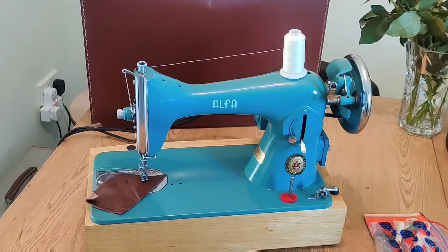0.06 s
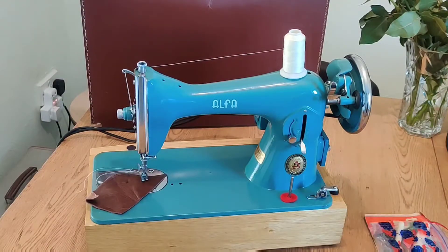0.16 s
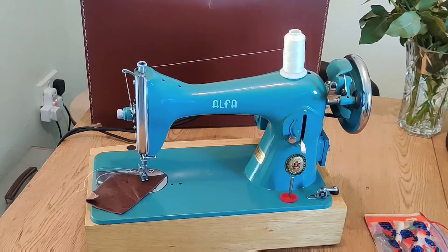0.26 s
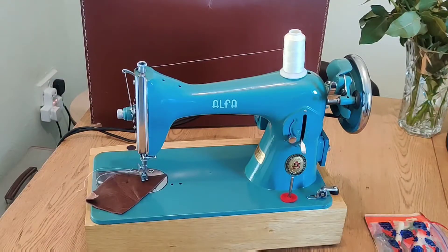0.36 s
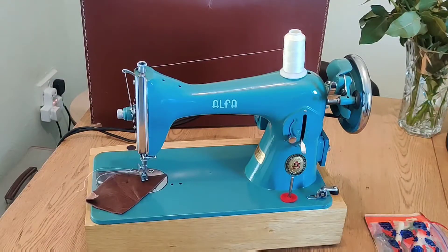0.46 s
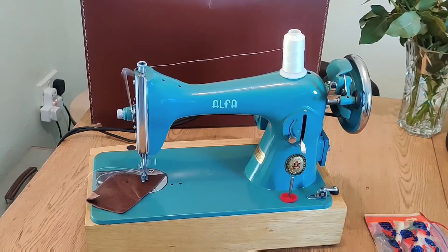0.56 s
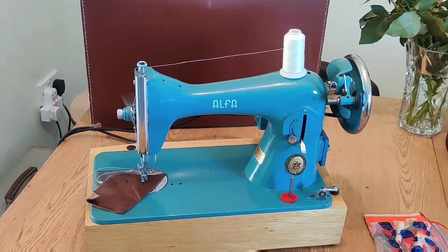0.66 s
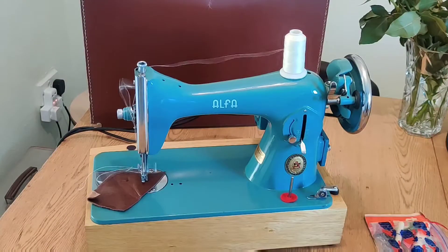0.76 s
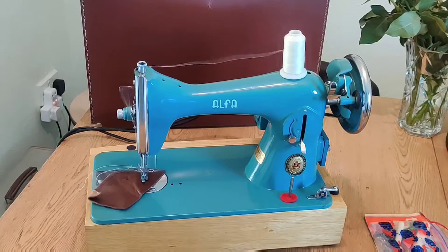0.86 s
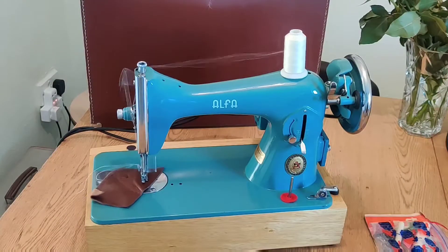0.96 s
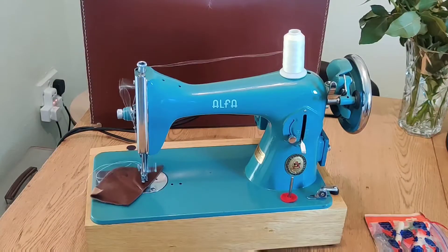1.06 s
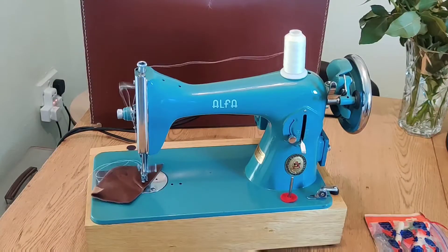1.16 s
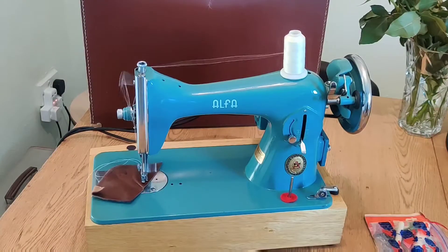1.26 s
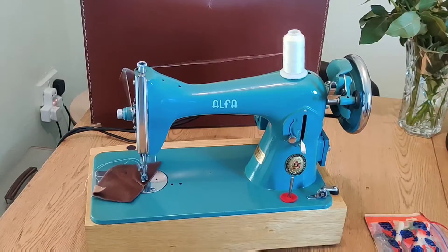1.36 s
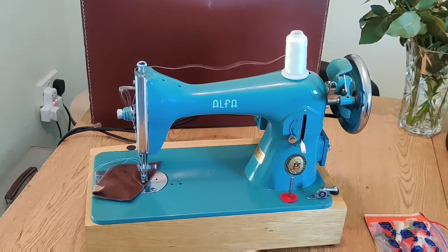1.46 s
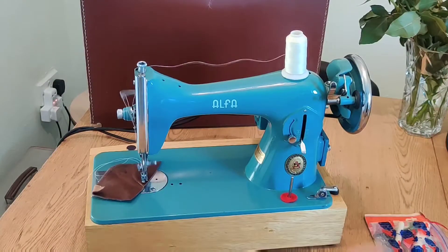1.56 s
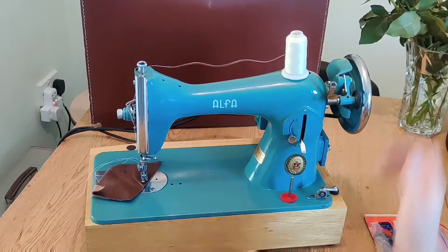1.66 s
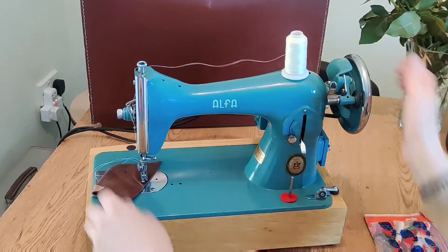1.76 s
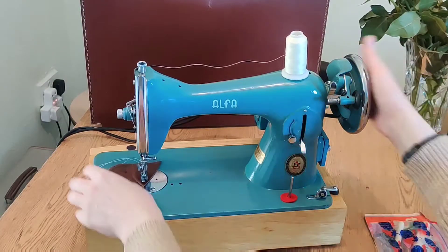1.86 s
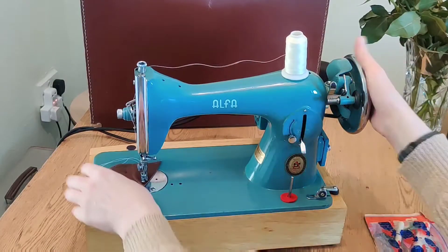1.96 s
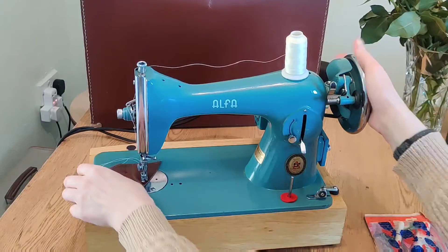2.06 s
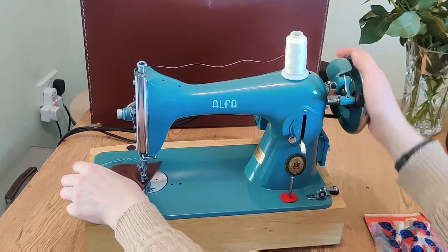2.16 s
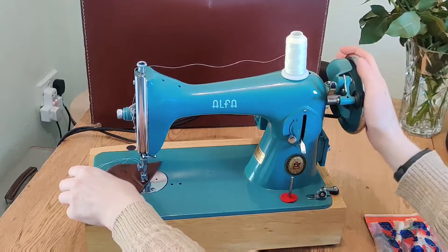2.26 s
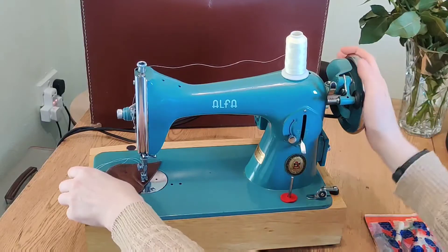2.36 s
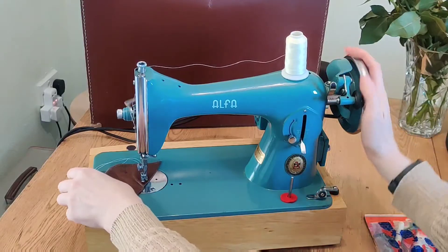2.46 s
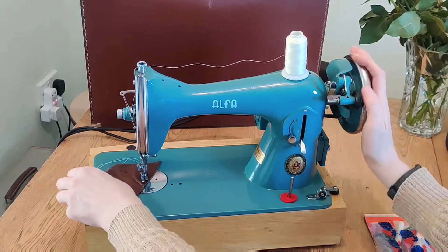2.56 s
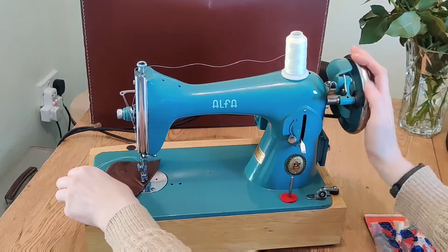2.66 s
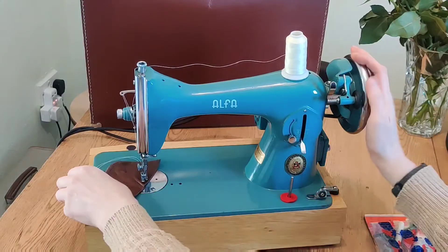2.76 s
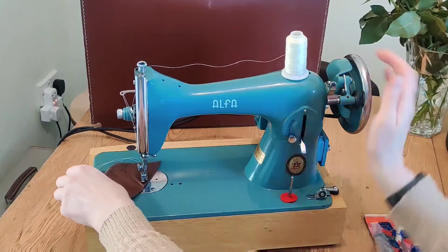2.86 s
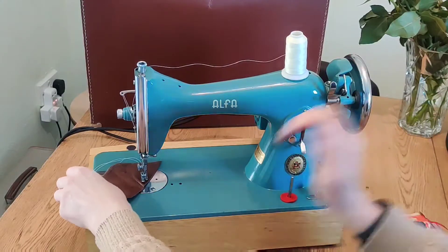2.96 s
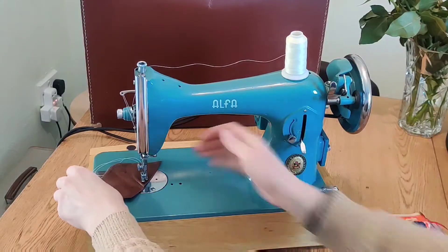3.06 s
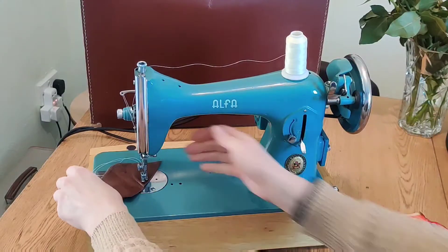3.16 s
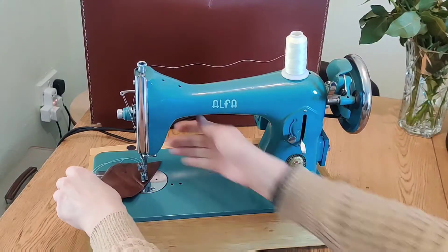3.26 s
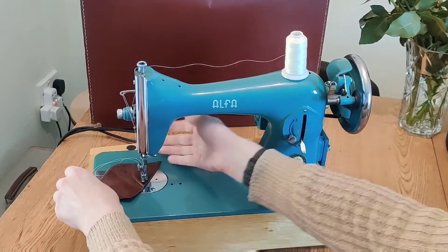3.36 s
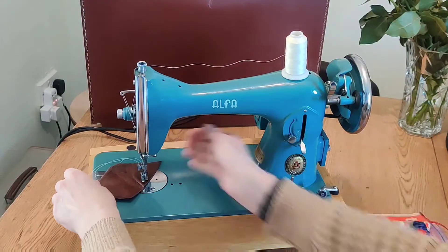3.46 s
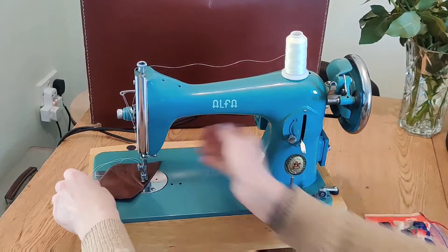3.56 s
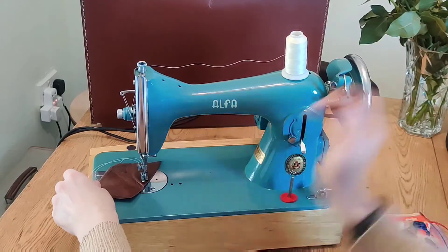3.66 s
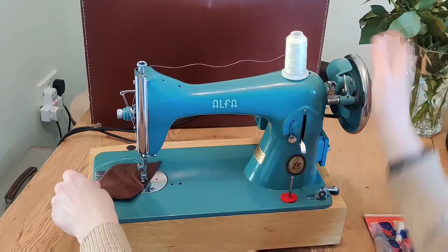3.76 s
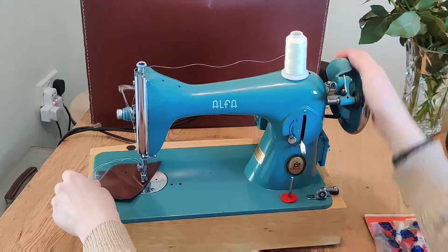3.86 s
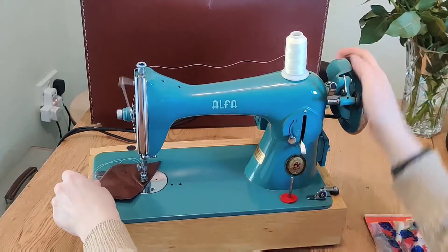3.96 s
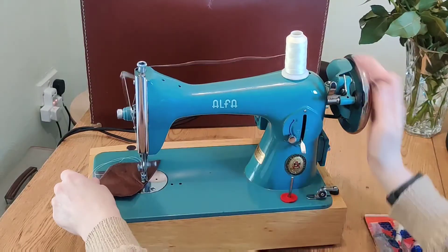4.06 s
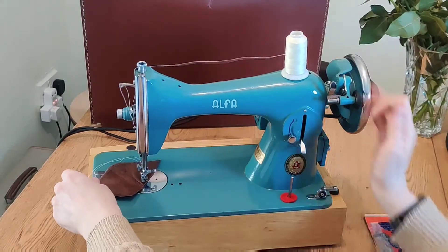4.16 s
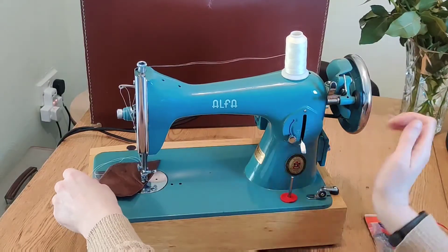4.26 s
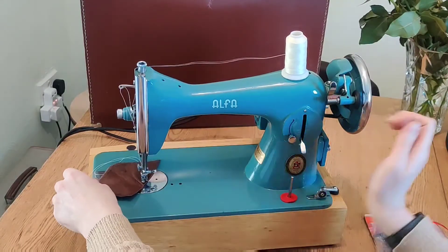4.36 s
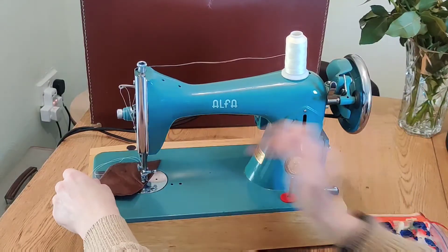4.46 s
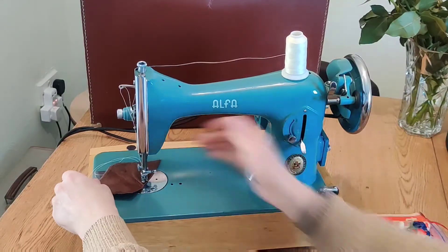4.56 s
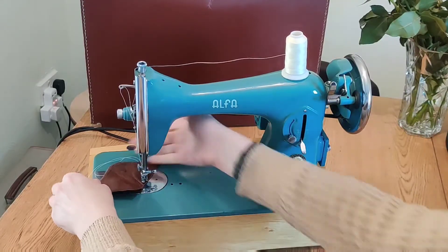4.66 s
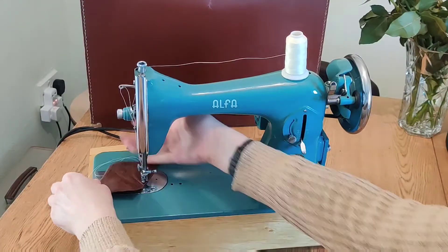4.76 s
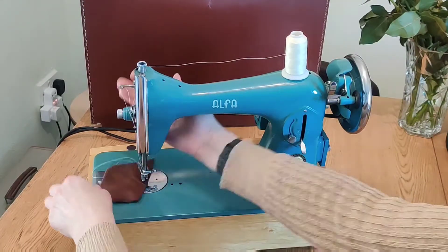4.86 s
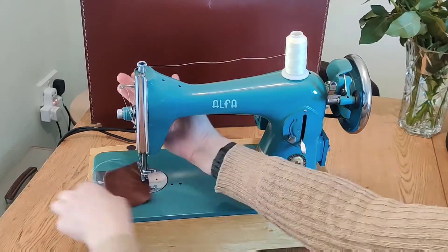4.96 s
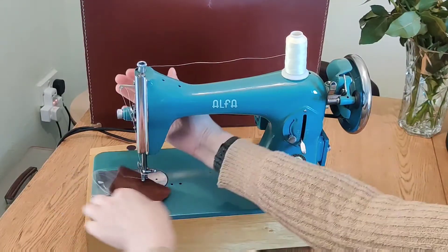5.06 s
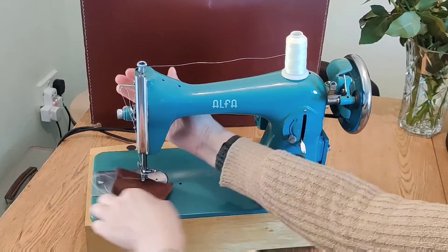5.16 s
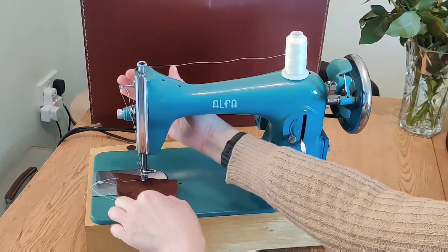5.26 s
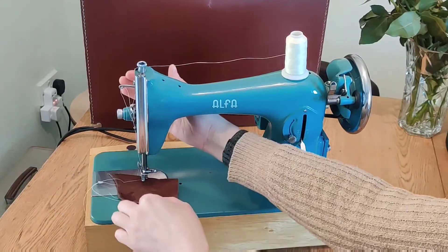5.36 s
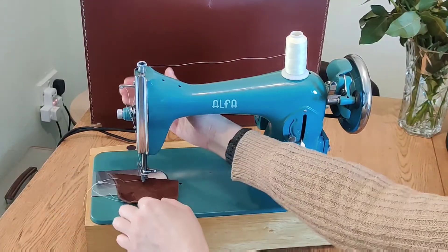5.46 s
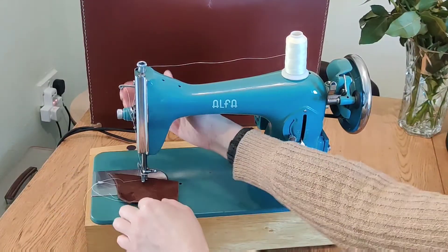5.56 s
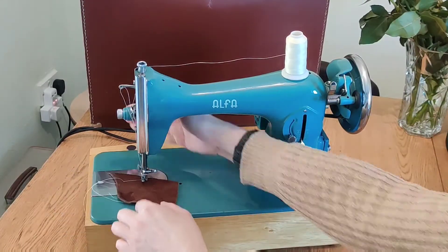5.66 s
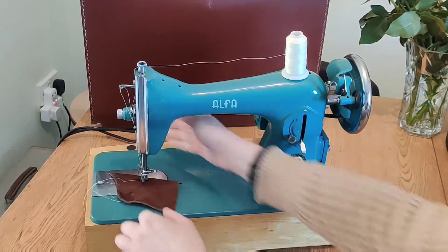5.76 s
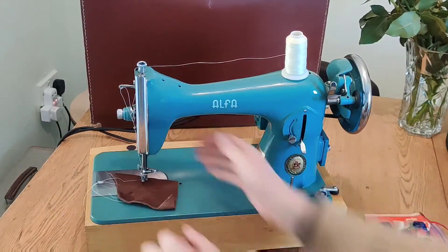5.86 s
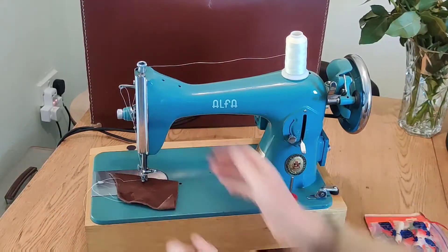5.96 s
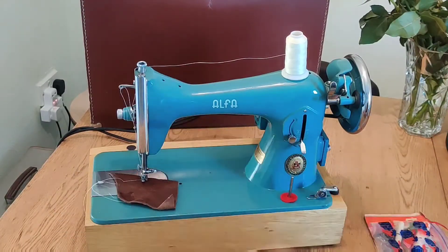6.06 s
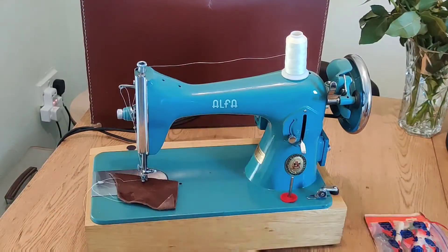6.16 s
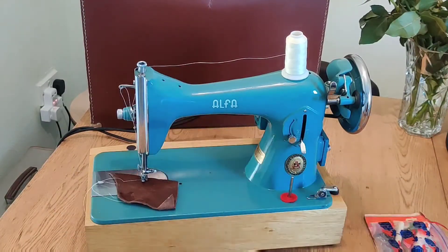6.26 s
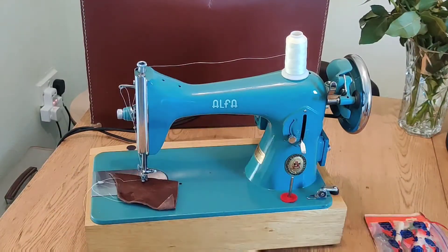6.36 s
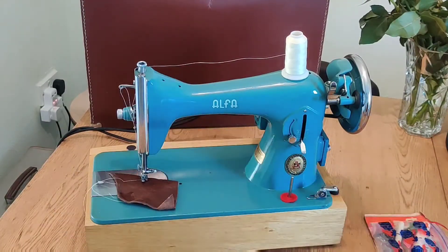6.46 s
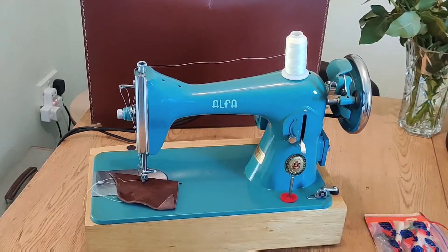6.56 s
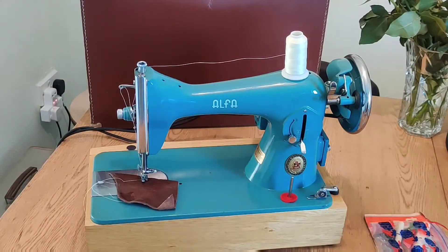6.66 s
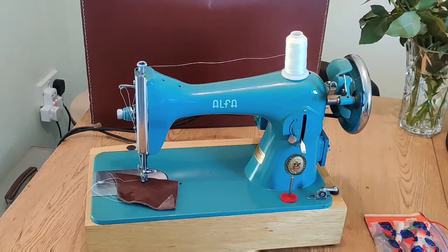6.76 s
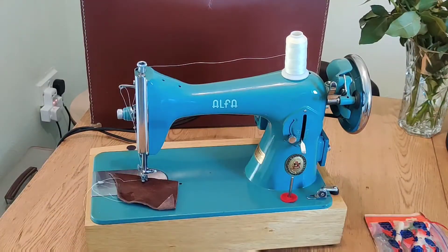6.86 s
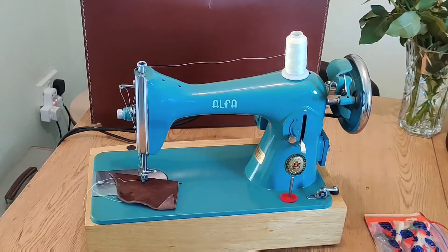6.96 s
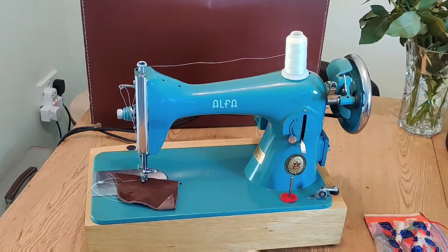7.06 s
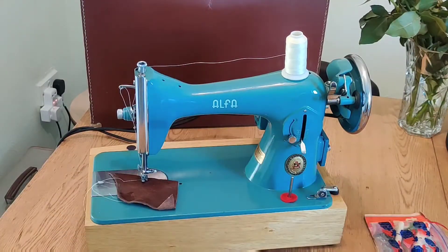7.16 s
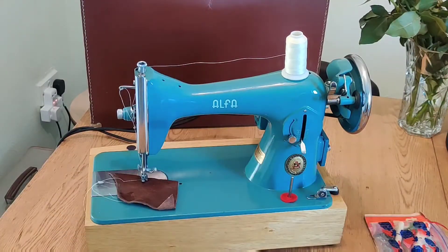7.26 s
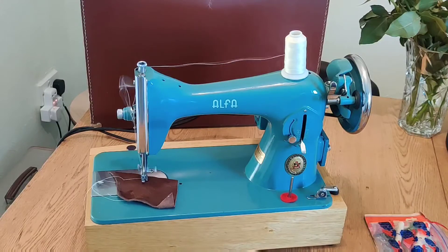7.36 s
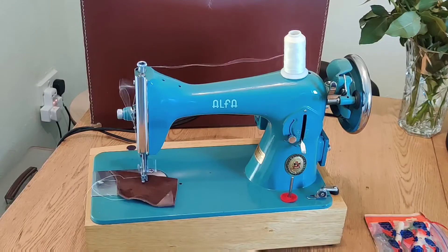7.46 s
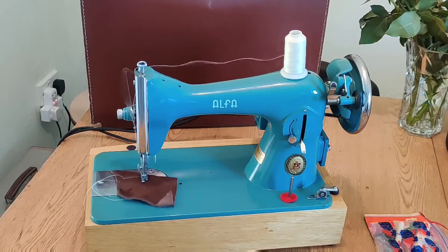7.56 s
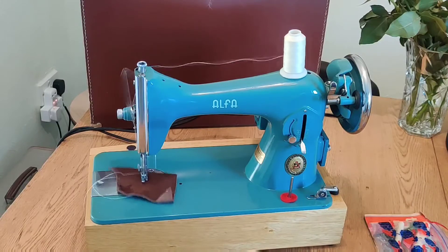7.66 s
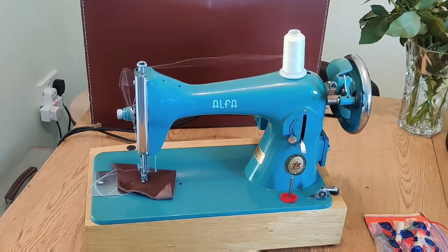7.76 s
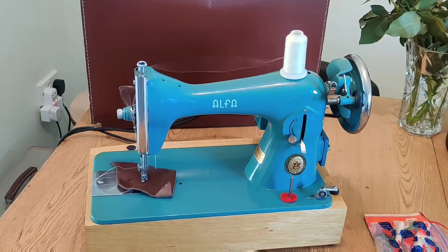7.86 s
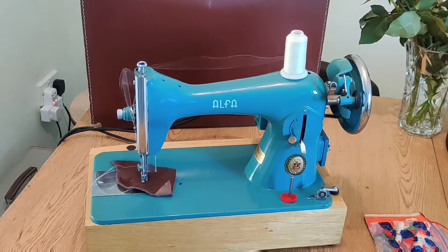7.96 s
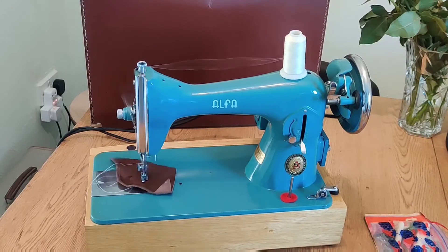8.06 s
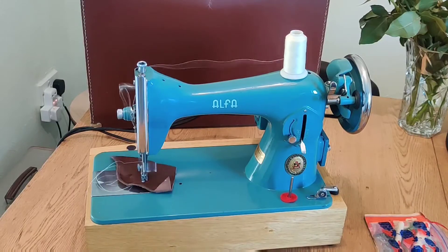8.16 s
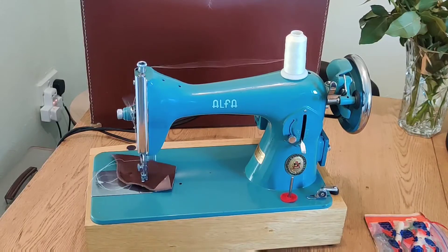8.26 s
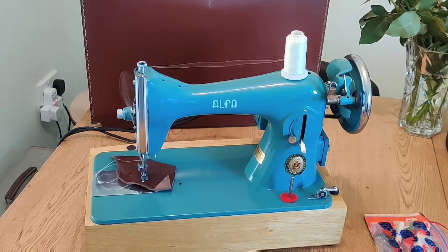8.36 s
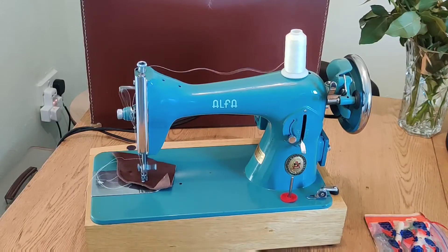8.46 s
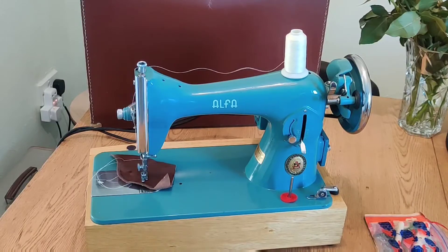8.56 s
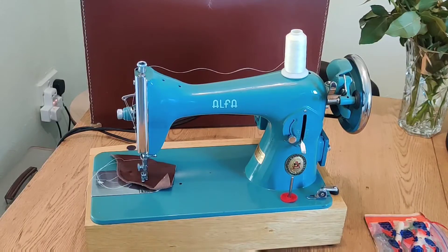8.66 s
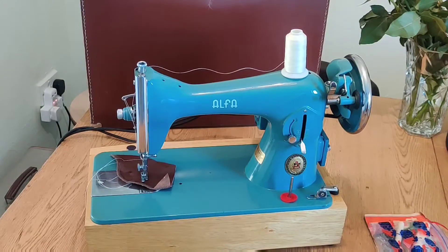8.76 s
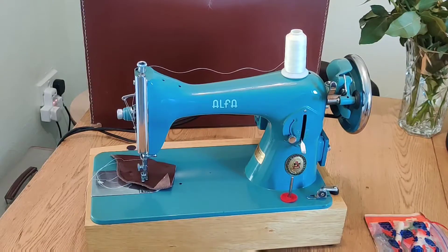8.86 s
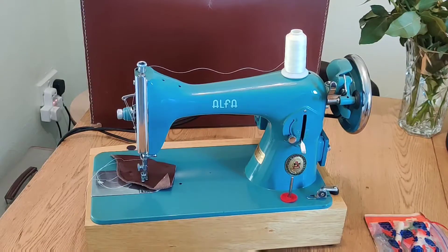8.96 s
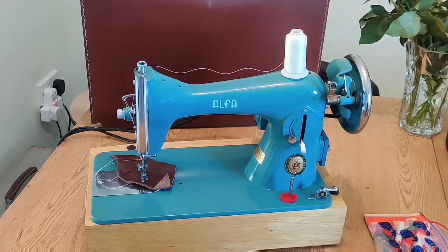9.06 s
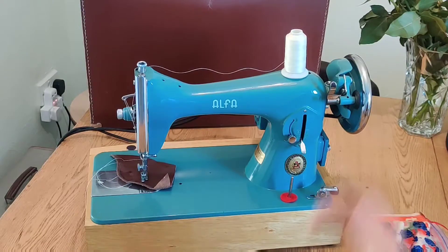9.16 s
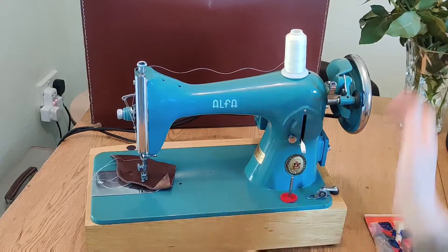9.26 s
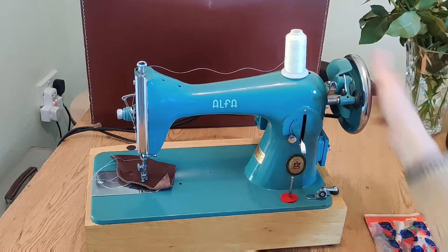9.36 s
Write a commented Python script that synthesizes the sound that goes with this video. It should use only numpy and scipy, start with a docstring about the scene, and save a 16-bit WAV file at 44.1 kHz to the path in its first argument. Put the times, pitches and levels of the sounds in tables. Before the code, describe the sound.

An electric sewing machine chatters through leather in two short bursts, with wheel taps and sharp lever clicks between, over a faint hum in a small room.

```python
"""An electric sewing machine on a wooden base stitches leather in two short runs, speeding up and coasting down.
Between them a hand turns the wheel and snaps the presser lever up and down; a small room answers over a faint hum.
Dense random contacts and short blows excite resonances of base, casting, hook, lever and wheel; filtered noise
makes sliding steel, thread and leather; summed sines make motor buzz and hum; decaying noise makes the room."""
import sys
import numpy as np
from scipy import signal
from scipy.fft import rfft, irfft, next_fast_len
from scipy.io import wavfile
from scipy.ndimage import uniform_filter1d, map_coordinates

SR = 44100
rng = np.random.default_rng(int(sys.argv[2]) if len(sys.argv) > 2 else 0)


def store_wav(level_fs):
    """Save 16-bit WAV to argv[1]."""
    pcm = np.round(np.clip(np.atleast_2d(level_fs), -1, 1) * 32767)
    wavfile.write(sys.argv[1], SR, pcm.T.astype(np.int16))


N = 414981  # samples, about 9.4 s

# Running gear in two runs: (time [s], level [dB], share of the base [dB], share of the treble [dB])
RUNNING_GEAR = [
    [(0.6, -79.5, -6.5, 0.5), (0.66, -63.5, 5.5, -7.5), (0.69, -53, 7, -7), (0.755, -49, 1.5, -9),
     (0.77, -45.5, 1.5, -8), (0.85, -36, -4, -7.5), (0.93, -32, -3, -8), (0.998, -29.5, -1, -5.5),
     (1.14, -30.5, -7, -8.5), (1.264, -32, 1.5, -9.5), (1.4, -37.5, -3, -9), (1.53, -40, -4, -10),
     (1.6, -44.5, -2, -13.5), (1.682, -44.5, -6, -11.5), (1.776, -61.5, 4, -12.5), (1.916, -74, -10, -3),
     (1.95, -68, 14, -26)],
    [(7.28, -86.5, -4, 1), (7.384, -57.5, 1, -11), (7.484, -43.5, -1, -5), (7.644, -31, 1, -7),
     (7.84, -26.5, 0, -6.5), (8.402, -36, -3, -9.5), (8.472, -37, -7, -9.5), (8.536, -43, 4.5, -11.5),
     (8.585, -55, 2.5, -12), (8.61, -43.5, -3.5, -9.5), (8.66, -45, -7, -15.5), (8.69, -48.5, -7.5, -16),
     (8.728, -53.5, -3, -13.5), (8.92, -120, 1, -26.5)],
]
# Single knocks in the casting, from the runs, hand, wheel and lever:
# (time [s], relative peak level [dB], pitch [Hz], stirred bandwidth over pitch [ratio])
CASTING_KNOCKS = [(0.691, -37.5, 1009, 0.52), (0.763, -36.5, 990, 0.65), (1.753, -43, 557, 1),
                  (2.316, -50, 880, 1), (2.471, -53.5, 594, 0.5), (2.561, -45.5, 594, 1),
                  (2.585, -64, 590, 0.69), (2.627, -61.5, 900, 0.87), (3.622, -59.5, 810, 1),
                  (3.944, -50, 1510, 0.68), (4.01, -47, 568, 0.9), (4.069, -44, 946, 0.86),
                  (4.091, -45, 930, 0.84), (4.122, -35.5, 933, 0.64), (4.123, -44.5, 1380, 0.33),
                  (4.17, -65, 990, .4), (4.198, -52.5, 945, 0.94), (4.239, -42, 960, 0.84),
                  (4.251, -44.5, 950, 1), (4.915, -35, 835, 0.523), (5.492, -64.5, 953, 0.7),
                  (5.623, -56, 922, 0.156), (5.709, -51.5, 680, 0.333), (6.218, -64, 504, 0.082),
                  (6.411, -61, 605, 1), (6.68, -65.5, 660, 0.23), (6.72, -63, 695, 0.27),
                  (6.78, -67.5, 715, 0.26), (6.83, -66.5, 642, 0.26), (6.89, -71.5, 740, 0.25),
                  (7.248, -65.5, 960, 0.4), (7.462, -34, 587, 0.6), (8.437, -37, 595, 0.175),
                  (8.525, -34, 880, 0.48), (8.643, -39.5, 550, 0.163)]
# Resonances of the wooden base: (frequency [Hz], width [Hz], level [dB])
BASE_MODES = [(32, 21, -14), (52, 29, -13.5), (57.9, 4.1, -1.5), (128.45, 10, 0.5), (154.2, 22, -3),
              (182.4, 13, -0.5), (228.15, 19, -3), (255.46, 13, 3), (287.66, 19, -2.5), (332.55, 14, 0),
              (416.2, 28, -5.5)]
# Resonances of the metal casting: (frequency [Hz], width [Hz], level [dB])
CASTING_MODES = [(583.1, 45, -4), (687.2, 42, -5), (814, 180, -8), (903.46, 36, -1.5), (927.9, 27, -1.5),
                 (973.16, 42, -1.5), (1067.4, 30, -4), (1194.6, 92, -5.5), (1409, 100, -5.5),
                 (1549.6, 130, -7.5), (1824, 220, -13)]
FULL_SPEED_DB = -30  # running level taken as full speed
KNOCK_REACH, THUMP_REACH = 0.67, 1  # default bandwidth over pitch


def amp(db):
    """Decibels as an amplitude ratio."""
    return 10 ** (np.asarray(db) / 20)


def unit(x):
    """Normalisation to an rms of one."""
    return x / np.sqrt(np.mean(x ** 2) + 1e-20)


def along(points, hz):
    """Interpolation of (frequency, value) points on a logarithmic frequency axis."""
    f, v = np.transpose(points)
    return np.interp(np.log(hz + 1), np.log(f + 1), v)


def gains(tables, held=False):
    """Amplitude envelopes, one per dB column; silent outside the tables unless held."""
    t, rows = np.arange(N) / SR, np.concatenate(tables)
    if held:
        on = 1
    else:
        inside = sum((t >= table[0][0]) & (t <= table[-1][0]) for table in tables) > 0
        on = uniform_filter1d(inside * 1., size=900)  # softens the edges
    return [on * amp(np.interp(t, rows[:, 0], column)) for column in rows[:, 1:].T]


def wobble(rate):
    """Slow random modulation: a smooth curve through random knots, rate of them a second."""
    knots = rng.standard_normal(int(N * rate / SR) + 4)
    return map_coordinates(knots, [np.arange(N) * rate / SR])


def filtered(x, response):
    """Linear filtering: the spectrum of x times a complex response of frequency."""
    m = next_fast_len(x.shape[-1] + 8192)
    spectrum = rfft(x, m) * response(np.fft.rfftfreq(m, 1 / SR))
    return irfft(spectrum, m)[..., :x.shape[-1]]


def ring(f, hz, width):
    """Damped resonator: one causal resonance with gain 1 at its centre."""
    return 1j * f * width / (hz * hz - f * f + 1j * f * width + 1e-9)


def modes(table):
    """Modal superposition: a body's response as a sum of resonances of alternating sign."""
    return lambda f: sum((-1) ** k * amp(db) * ring(f, hz, w) for k, (hz, w, db) in enumerate(table))


def coloured(points):
    """Spectral shaping by a smooth gain curve in dB."""
    return lambda f: amp(along(points, f))


def paired(pair):
    """Stereo coherence: a mid/side mix gives two unrelated signals a set likeness at each frequency."""
    # Left-right likeness: (frequency [Hz], correlation [-1 to 1])
    likeness = [(60, 1), (130, 1), (290, 0.897), (640, 0.403), (1400, -0.029), (3080, -0.187),
                (6770, -0.229), (14900, -0.061)]

    def mid_side_weights(f):
        angle = np.arccos(np.clip(along(likeness, f), -1, 1)) / 2
        return np.array([np.cos(angle), np.sin(angle)])

    mid, side = filtered(pair, mid_side_weights)
    return np.array([mid + side, mid - side])


def contacts(spread_db, lumps_db, rate):
    """Friction as dense small contacts of very uneven size that come in lumps."""
    size_db = spread_db * rng.standard_normal(N) + lumps_db * wobble(rate)
    return rng.standard_normal(N) * amp(size_db)


def blows(events, body, reach, contact, lead):
    """Impact excitation: each short contact stirs mostly the modes near its pitch.

    contact is the 60 dB decay of the push [s]; lead starts it a little before it is loud [s]."""
    out, t = np.zeros(N + SR), np.arange(SR // 4) / SR
    for s, db, hz, *own in events:
        width = (own or [reach])[0] * hz
        push = (1.8 + rng.standard_normal(len(t))) * amp(-60 * t / contact)
        hit = filtered(push, lambda f: body(f) * ring(f, hz, width) ** 2)
        out[round((s - lead) * SR):][:len(t)] += amp(db) * hit / np.abs(hit).max()
    return out[:N]


def room_tone():
    """Slowly changing background: soft air noise, far rumble, a wavering hum and a thin whine."""
    # Background levels: (time [s], relative air level [dB], relative whine level [dB])
    air_levels = [(0.0, -69, -79.5), (0.2, -75, -86), (0.6, -77.5, -94), (1.95, -77.5, -85),
                  (3.2, -77.5, -100), (3.8, -81, -101), (4.8, -79, -101), (5.47, -80, -101),
                  (6.26, -78.5, -101), (6.86, -78, -96), (7.25, -76, -98.5), (8.9, -75.5, -80.5),
                  (9.26, -78.5, -83), (9.41, -74.5, -90)]
    # Air spectrum: (frequency [Hz], level [dB])
    air_colour = [(40, 2), (60, 7), (85, 2.5), (200, 4.5), (600, -1.5), (2000, -8), (4000, -15),
                  (7000, -15), (12000, -14), (15500, -18)]
    # Far rumble and shaking of the table: (time [s], level [dB])
    rumble_swells = [(0, -80), (2.1, -78.5), (3.3, -80.5), (3.75, -85), (3.95, -69.5), (4.3, -68),
                     (4.55, -72.5), (4.73, -82.5), (4.95, -68), (5.4, -76.5), (5.7, -87.5), (6.25, -81),
                     (6.9, -81), (7.2, -93.5), (8.9, -82.5), (9.41, -72.5)]
    # Rumble spectrum: (frequency [Hz], level [dB])
    rumble_colour = [(10, -8), (30, -5.5), (55, -9.5), (100, -28), (200, -87)]
    # Hum tones: (frequency [Hz], relative level [dB], waver [Hz], swell [dB])
    hum_tones = [(120.33, -69, 1.3, 0.5), (199.3, -93, 6.2, 3), (262.7, -91.5, 1.1, 1.5)]

    def noise(colour):
        return unit(filtered(paired(rng.standard_normal((2, N))), coloured(colour)))

    def tone(hz, waver, swell_db):
        phase = 2 * np.pi * np.cumsum(hz + waver * wobble(9.1)) / SR
        return amp(1.0 + swell_db * wobble(8.1)) * np.sin(phase)

    air_gain, whine_gain = gains([air_levels], held=True)
    air = amp(1.52 + 1.2 * wobble(4.9)) * air_gain * noise(air_colour)
    rumble_gain = gains([rumble_swells], held=True)[0] * amp(2.5 * wobble(8.4))
    rumble = rumble_gain * noise(rumble_colour)
    hum = sum(amp(db) * tone(hz, waver, swell_db) for hz, db, waver, swell_db in hum_tones)
    whine = whine_gain * tone(596, waver=4.8, swell_db=1.6)
    return air + rumble + hum + whine


def motor():
    """Magnetic force: the stalled motor buzzes at twice the mains frequency and its multiples."""
    # Buzz around each start of the machine: (time [s], relative level [dB])
    buzz_levels = [
        [(0.0, -85), (0.054, -73.5), (0.322, -77), (0.578, -78.5), (0.676, -62), (0.84, -67.5), (0.894, -64.5),
         (0.95, -64.5)],
        [(6.6, -88.5), (6.636, -93), (6.694, -78.5), (6.742, -85), (7.284, -75), (7.406, -63), (7.546, -60),
         (7.6, -59)],
    ]
    # Partials of the buzz: (frequency [Hz], relative level [dB])
    partials = [(100, 1), (200, -3.5), (300, -11), (400, -19.5), (500, -12), (600, -12), (700, -23),
                (900, -20.5), (1000, -23), (1100, -19.5)]
    t = np.arange(N) / SR
    buzz = np.zeros(N)
    for k, (hz, db) in enumerate(partials):
        flutter = amp(db + 2.0 + 1.5 * wobble(8.3))
        buzz += flutter * np.sin(2 * np.pi * hz * t + k * k)
    return gains(buzz_levels)[0] * buzz


def hands():
    """Friction: slow turning drags in base and casting; leather and sleeves rustle."""
    # Slow turning by hand, leather shifted: (time [s], relative level [dB])
    drag_levels = [
        [(2.05, -94), (2.45, -68), (2.64, -74), (2.75, -67), (2.86, -66.5), (3.15, -74.5)],
        [(3.9, -76.5), (4.0, -58.5), (4.12, -58), (4.25, -52.5), (4.31, -56), (4.35, -63), (4.5, -89)],
        [(5.625, -63.5), (5.668, -59), (5.794, -60.5), (5.928, -88)],
        [(6.15, -71.5), (6.65, -81), (6.8, -73), (6.95, -86.5), (7.108, -97.5), (7.25, -80)],
    ]
    # Rustle of leather and sleeves: (time [s], relative level [dB])
    rustle_levels = [
        [(0.0, -67), (0.2, -71), (0.316, -73), (.55, -73.5), (0.62, -65.5)],
        [(2.43, -93.5), (2.564, -79.5), (2.728, -87), (2.774, -67.5), (2.825, -75), (2.85, -60.5), (2.9, -58.5),
         (2.96, -68), (3.01, -80), (3.1, -77.5)],
        [(4.02, -78.5), (4.12, -64), (4.296, -73.5), (4.42, -88)],
        [(6.05, -83.5), (6.135, -77), (6.254, -76), (6.39, -75), (6.65, -77.5), (6.875, -68.5), (7.11, -74),
         (7.188, -71), (7.3, -76)],
        [(9.18, -97), (9.262, -74), (9.41, -91.5)],
    ]
    # Rustle spectrum: (frequency [Hz], level [dB])
    rustle_colour = [(300, -5.5), (1200, 1), (3000, -1.5), (5000, -5), (7000, -3.5), (10000, -10),
                     (15500, -12)]
    push = contacts(3, lumps_db=4, rate=35)
    in_base = unit(filtered(push, modes(BASE_MODES)))
    in_casting = unit(filtered(push, modes(CASTING_MODES)))
    drag = unit(in_base + 0.86 * in_casting)
    rub = contacts(3, lumps_db=1.2, rate=30)
    rustle = unit(filtered(rub, coloured(rustle_colour)))
    return amp(-5.5) * gains(drag_levels)[0] * drag + amp(-1.0) * gains(rustle_levels)[0] * rustle


def running_db(s):
    """Envelope interpolation: level of the running gear at time s."""
    return np.interp(s, *np.concatenate(RUNNING_GEAR).T[:2])


def stitches():
    """Machine cycles: all stitch rows as columns, with each stitch's length after its time."""
    # One row per stitch, levels over the running level:
    # (time [s], thread pull [relative dB], needle knock [dB], its pitch [Hz], feed knock [dB],
    #  shuttle knock [dB], its pitch [Hz])
    stitch_runs = [
        [(.685, -15.5, 1.5, 1040, -1.5, 2.5, 1010), (.794, -17.5, 8.5, 865, 4.5, 8, 630),
         (.852, -5, -0.5, 950, 3, 8, 580), (.918, -10, 6.5, 1060, -2, 1.5, 597),
         (.985, -11.5, 6, 950, 4, 5.5, 590), (1.042, 0, 9, 930, 1, 8.5, 890),
         (1.098, -6.5, -1.5, 670, 6.5, 1.5, 910), (1.155, -5, 0, 665, -6.5, -11, 596),
         (1.214, -5.5, 7.5, 560, -7, 8, 1000), (1.266, -3.5, 8, 1000, 7.5, 13, 636),
         (1.355, -1, 11.5, 950, -12, -11.5, 600.1), (1.435, -2, 9, 960, 9, 7.5, 840),
         (1.518, -7, 10, 950, 5.5, 15, 993), (1.658, -1.5, 2.5, 678, 9.5, -5, 600)],
        [(7.4, -5.5, 6.5, 610, 5, 10, 580), (7.488, -13.5, 12, 890, -4, 9.5, 574),
         (7.568, -1, 6.5, 590, 8, 6.5, 914.8), (7.654, -9.5, 0.5, 950, -12, 10, 950),
         (7.719, -5.5, 5.5, 950, -3.5, 13.5, 800), (7.779, -3, -2.5, 950, -1, 11.5, 930),
         (7.837, -3.5, 8, 595, -6, 11, 870), (7.898, -7.5, -7, 950, 2, 13.5, 886),
         (7.963, 1, -9.5, 950, -5, 11, 955), (8.028, 0.5, 8.5, 950, 2, 9, 1010), (8.105, 1, 10, 564, 8, 5, 950),
         (8.188, 3, 8.5, 960, 2, 0, 610), (8.266, 1.5, 11.5, 950, 7.5, 7, 950),
         (8.358, -18, -3, 1030, -7, 8, 560), (8.472, 0, 14, 980, 7.5, 16, 890),
         (8.6, -0.5, 4, 600, 9, 9.5, 587)],
    ]
    # Length of the last stitch: one per run [s]
    last_lengths = [0.11, 0.165]
    rows = []
    for run, last in zip(stitch_runs, last_lengths):
        run = np.array(run)
        start = run[:, 0]
        rows.append(np.c_[start, np.append(np.diff(start), last), run[:, 1:]])
    return np.concatenate(rows).T


def stitch_blows():
    """Cyclic impacts: needle, feed and shuttle knock and the base is thumped at fixed turns of each stitch."""
    # Two thumps a stitch: (place in the stitch [turns], mean level over the running level [relative dB],
    #  median pitch [Hz])
    cycle_thumps = [(-.05, 2.5, 253.4), (.45, 0, 190)]
    scatter_db, scatter_pitch = 4.5, .2  # standard deviations [dB, natural log of pitch]
    s, length, _, needle_db, needle_hz, feed_db, shuttle_db, shuttle_hz = stitches()

    def at(turn, db, hz):
        time = s + turn * length
        return list(zip(time, running_db(time) + db, hz + 0 * s))

    chance = rng.standard_normal((len(s), len(cycle_thumps), 2))
    thumps = []
    for k, (turn, db, hz) in enumerate(cycle_thumps):
        thumps += at(turn, db + scatter_db * chance[:, k, 0], hz * np.exp(scatter_pitch * chance[:, k, 1]))
    knocks = at(0.0596, needle_db, needle_hz) + at(.27, feed_db, 796) + at(.69, shuttle_db, shuttle_hz)
    return knocks, thumps


def machine():
    """Forced vibration: cams, hook and needle bar shake base and casting and slide steel, pulsing each stitch."""
    # Base, casting, hook, sliding steel: (level at full speed before the shares [dB],
    #  pulse at a full-speed stitch length [dB], phase of the pulse [turns])
    gear_pulses = [(-34, -0.5, 0.02), (-34.5, 1, 0.947), (-34, 0.5, 0.03), (-34.5, 0.5, 0.13)]
    # Resonances of the hook: (frequency [Hz], width [Hz], level [dB])
    hook_modes = [(2351, 790, 3), (2410, 45, 10.5), (2654, 200, 1.5), (2779.4, 45, 6), (2910, 68, -1),
                  (3520, 1300, -5), (3726, 43, 3.5)]
    # Sliding steel spectrum: (frequency [Hz], level [dB])
    steel_colour = [(300, -28), (1200, -4.5), (3000, -0.5), (5000, -1), (8000, -5), (12000, -16.5),
                    (15500, -16.5)]
    # Thumps into the wooden base: motor start-up, first run, hand, wheel and lever:
    # (time [s], relative peak level [dB], pitch [Hz])
    base_thumps = [(0.668, -42.5, 170), (0.705, -42.5, 325), (0.725, -43, 330), (0.745, -42, 321.3),
                   (0.965, -28, 230), (0.995, -24.5, 250), (1.035, -28.5, 185), (2.233, -53, 150),
                   (2.28, -52, 147), (2.366, -51.5, 145), (2.403, -52, 248), (2.526, -50, 146),
                   (2.566, -49, 251), (2.651, -51.5, 142), (2.692, -54.5, 262), (2.828, -52.5, 143.4),
                   (3.622, -61.5, 149.9), (3.953, -40, 239), (4.038, -43, 249), (4.13, -49, 282),
                   (4.244, -42.5, 205), (4.701, -58.5, 151.5), (4.921, -36.5, 240), (4.959, -34, 254),
                   (5.644, -44.5, 267), (5.717, -32, 283.5), (5.729, -42.5, 293), (5.745, -41, 192),
                   (5.78, -50, 250), (5.81, -45.5, 290)]
    full_stitch_s, slow_pulses = .06, 1  # the slower the stitch, the deeper its pulse
    casting_grows = 1.046  # exponent of casting level against running level
    thump_low_hz = 120.8  # a thump stirs little below this

    s, length = stitches()[:2]
    t = np.arange(N) / SR
    count = np.arange(len(s))
    turns = np.interp(t, np.c_[s, s + length].ravel(), np.c_[count, count + 1].ravel())
    slow = (np.interp(t, s + length / 2, length) / full_stitch_s) ** slow_pulses
    level, low, high = np.abs(gains(RUNNING_GEAR))
    level = level / amp(FULL_SPEED_DB)
    envelopes = [level * low, level ** casting_grows, level * high, level * high]
    shake, rattle, chatter, slide = [
        envelope * amp(db + pulse_db * slow * np.cos(2 * np.pi * (turns - turn)))
        for envelope, (db, pulse_db, turn) in zip(envelopes, gear_pulses)]

    hook = chatter * unit(filtered(contacts(1.8, lumps_db=4.5, rate=60), modes(hook_modes)))
    base = shake * unit(filtered(contacts(3.4, lumps_db=1.0, rate=60), modes(BASE_MODES)))
    casting = rattle * unit(filtered(contacts(3.7, lumps_db=0, rate=50), modes(CASTING_MODES)))
    steel = slide * unit(filtered(contacts(1.8, lumps_db=1.5, rate=21), coloured(steel_colour)))

    def wood(f):
        high_pass = f * f / (thump_low_hz ** 2 - f * f + 1j * f * thump_low_hz)
        return modes(BASE_MODES)(f) * high_pass ** 2

    stitch_knocks, stitch_thumps = stitch_blows()
    knocks = blows(CASTING_KNOCKS + stitch_knocks, modes(CASTING_MODES), KNOCK_REACH,
                   contact=0.004, lead=0.0029)
    thumps = blows(base_thumps + stitch_thumps, wood, THUMP_REACH, contact=0.0025, lead=0.009963)
    return base + casting + hook + steel + knocks + amp(-4.0) * thumps


def wheel():
    """Lightly damped resonance: running gear and the single casting knocks set one ring of the wheel singing."""
    full_speed_ring_db, grows = -49, 0.93  # level at full speed, exponent against running level
    level = np.abs(gains(RUNNING_GEAR)[0]) / amp(FULL_SPEED_DB)
    note = lambda f: ring(f, 1063.4, 7)  # centre and width [Hz]
    sing = unit(filtered(contacts(1.9, lumps_db=3.5, rate=19), note))
    struck = blows(CASTING_KNOCKS, lambda f: 1, KNOCK_REACH, contact=.003, lead=.003)
    return amp(full_speed_ring_db) * level ** grows * sing + amp(14) * filtered(struck, note)


def thread():
    """Friction noise: each thread pull is a soft swish that swells within a few milliseconds."""
    # Swish spectrum: (frequency [Hz], level [dB])
    thread_colour = [(1000, -22.5), (2500, 3.5), (5000, -2.5), (8000, -4.5), (12000, -6.5), (15500, -17.5)]
    usual_pull_db = -7  # over the running level; each stitch adds its own
    decay_s = 0.24  # 60 dB decay
    pull, t = np.zeros(N + SR), np.arange(SR // 4) / SR
    swell = 1 - np.exp(-t / 0.0029)
    for s, _, db in stitches()[:3].T:
        fall = amp(running_db(s) + usual_pull_db + db - 60 * t / decay_s)
        pull[round(s * SR):][:len(t)] += fall * swell
    return pull[:N] * unit(filtered(contacts(2.8, lumps_db=3.5, rate=100), coloured(thread_colour)))


def ticks():
    """Transient radiation: a steel tick is a crack with a short rattle after it, strengthened near its pitch."""
    # Ticks and snaps: (time [s], relative peak level [dB], relative brightness [dB], pitch [Hz])
    steel_ticks = [(2.17, -67, -23, 3595), (2.186, -71, -22.5, 3650), (2.2753, -67.5, -21, 2670),
                   (2.5546, -61.5, -24, 3050), (3.946, -60, -20, 5000), (4.0083, -53, -38.5, 2100),
                   (4.0709, -54.5, -17, 1620), (4.107, -47, -19, 4330), (4.1944, -50, -24, 2336),
                   (4.6951, -69.5, -18.5, 4800), (4.9148, -29.5, -20, 5640), (5.624, -33.5, -8.5, 2260),
                   (5.7599, -50, -13.5, 1520), (5.8778, -62.5, -8.5, 1550), (6.408, -60.5, -29, 4890),
                   (6.6635, -59, -20, 4850)]
    # Spectrum of a tick: (frequency [Hz], level [dB])
    tick_colour = [(300, -36.5), (800, -11), (1500, 3), (2500, 1.5), (3200, -2), (4000, -8), (5000, -10.5),
                   (5400, -2), (6500, -11), (8000, -8.5), (12000, -14), (15500, -20)]
    out, t = np.zeros(N + SR), np.arange(SR // 5) / SR
    crack, rattle = amp(-60 * t / .01), amp(-60 * t / 0.21)  # 60 dB decays of 0.01 and 0.21 s
    for s, db, bright_db, hz in steel_ticks:
        burst = rng.standard_normal(len(t)) * (crack + 0.304 * rattle)

        def colour(f):
            treble = np.clip(np.log2(f / 5000 + 1e-9), 0, 1)  # rises over the octave above 5 kHz
            tilt = amp(along(tick_colour, f) + (bright_db + 9.5) * treble)
            return tilt * (1 + 1.2 * ring(f, hz, 470))

        tick = filtered(burst, colour)
        out[round(s * SR):][:len(t)] += amp(db) * tick / np.abs(tick).max()
    return out[:N]


def lever():
    """Modal impact: the presser lever rings with its own modes at every snap."""
    # Lever snaps over: (time [s], relative peak level [dB], pitch [Hz], stirred bandwidth over pitch [ratio])
    lever_snaps = [(4.915, -33, 1484, 0.85), (4.9155, -47.5, 5260, 0.4), (5.623, -53, 1500, 1.86),
                   (4.915, -40.5, 2540, 0.23), (5.624, -44, 3444, 0.286), (5.624, -44, 2435, 0.347),
                   (5.624, -53, 4920, 0.35), (5.761, -48.5, 1497, 0.286), (5.761, -33.5, 810, 0.586),
                   (5.768, -38.5, 807, 0.4)]
    # Resonances of the lever: (frequency [Hz], width [Hz], level [dB])
    lever_modes = [(779.4, 41, -2.5), (809, 41.3, -3.5), (913.8, 18.7, 3), (1281, 37.6, -5.5),
                   (1548, 33.4, -1), (1890, 15, -3.5), (2204, 16.4, 3), (2452, 20, 1), (2648, 19, -1),
                   (3076, 34.5, -1), (3387, 43, 1.5), (4055, 27, -6.5), (4618, 35, 1), (5270, 48, 2),
                   (5583, 35, -7.5)]
    return blows(lever_snaps, modes(lever_modes), 1, contact=0.0025, lead=0.0022)


def room(x, hop=4096):
    """Reverberation: direct sound and decaying noise; overlapping pieces each get a fresh noise tail."""
    # Reverberation: (frequency [Hz], 60 dB decay time [s])
    decay_times = [(100, 0.715), (300, 0.27), (800, 0.29), (2000, 0.35), (5000, 0.31), (12000, 0.11)]
    # Room over direct sound: (frequency [Hz], relative level [dB])
    reverberant_levels = [(100, -0.5), (400, 0), (1000, -1), (3000, -3), (10000, 2.5)]
    build_up_s = 0.0066
    out, size = np.zeros((2, N + SR)), SR // 3
    padded = np.pad(x, (hop, 2 * hop))
    for start in range(0, N + hop, hop):
        hz, t, z = signal.stft(rng.standard_normal((2, size)), SR, nperseg=256)
        fall = amp(-60 * t / along(decay_times, hz)[:, None])
        fall *= amp(along(reverberant_levels, hz))[:, None] / np.linalg.norm(fall, axis=1, keepdims=True)
        tail = signal.istft(z * fall, SR, nperseg=256)[1][:, :size] / np.sqrt(128)
        tail *= np.clip(np.arange(size) / SR / build_up_s, 0, 1)
        # direct sound enters both signals of the stereo mix, one slightly later and weaker
        tail[[0, 1], [0, 3]] += [.8, .4]
        piece = padded[start:][:2 * hop] * np.hanning(2 * hop)  # overlapping pieces cross-fade
        out[:, start:][:, :2 * hop + size - 1] += signal.fftconvolve(piece[None], tail, axes=1)
    return paired(out[:, hop:hop + N])


def scene():
    """Superposition: the room answers the contact sounds; wheel ring, motor and room tone are added."""
    in_room = room(machine() + thread() + ticks() + lever() + hands())
    return amp(-1.1553) * in_room + wheel() + motor() + room_tone()


def record(dry):
    """Port resonance: two microphone ports, each with a bump near 5 kHz, colour the sound below a band limit."""
    # Left port response: (frequency [Hz], level [dB])
    left_port = [(100, 4), (500, 2), (1300, 1), (3500, 6), (4150, 7), (4600, 12), (4950, 19), (5300, 11.5),
                 (5900, -0.5), (8000, 4), (15000, 1.5)]
    # Right port response: (frequency [Hz], level [dB])
    right_port = [(100, -2.5), (500, 2), (1300, -1), (3500, 4.5), (4150, 1), (4600, 3), (5200, 6.5),
                  (6000, 2), (6600, 1.5), (8000, 1.5), (15000, 3)]
    top_hz = 15480
    return filtered(dry, lambda f: amp([along(left_port, f), along(right_port, f)]) * (f < top_hz))


dry = scene()
out = record(dry)
store_wav(out)
```